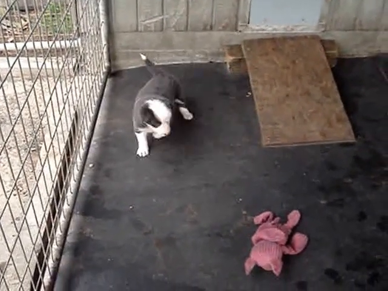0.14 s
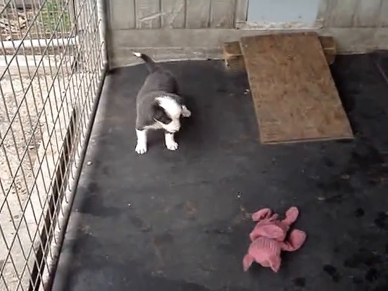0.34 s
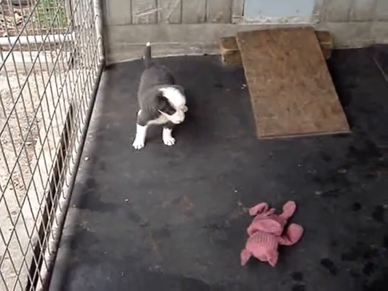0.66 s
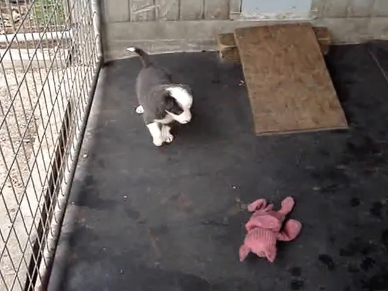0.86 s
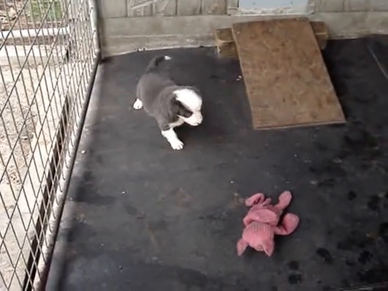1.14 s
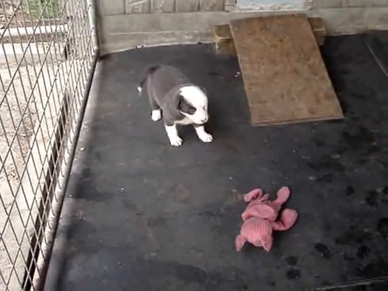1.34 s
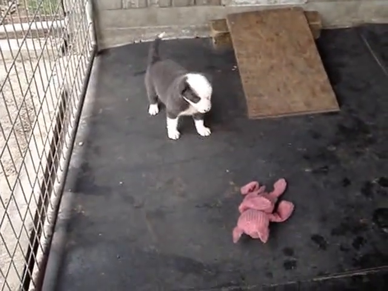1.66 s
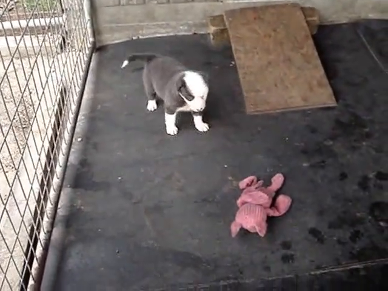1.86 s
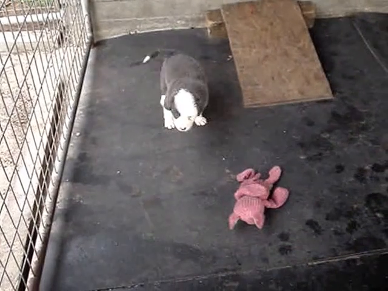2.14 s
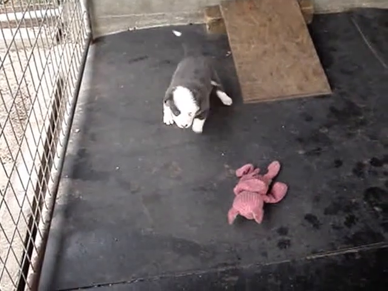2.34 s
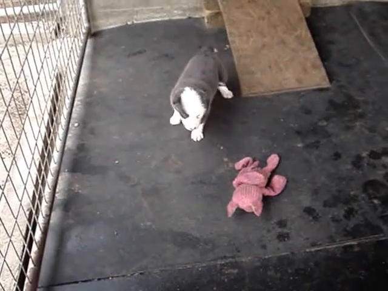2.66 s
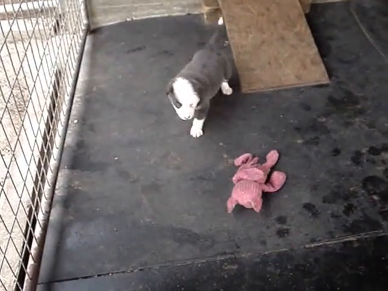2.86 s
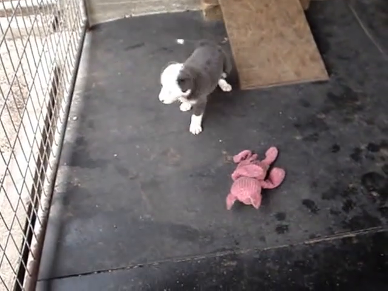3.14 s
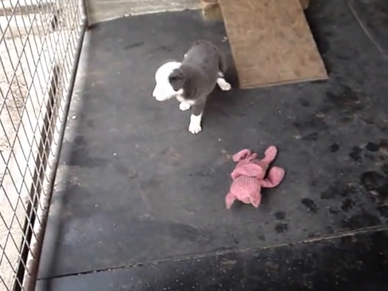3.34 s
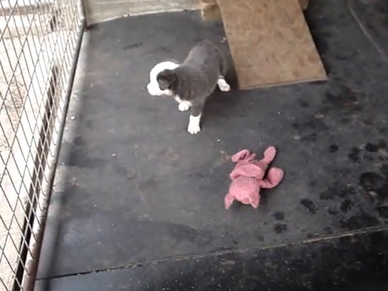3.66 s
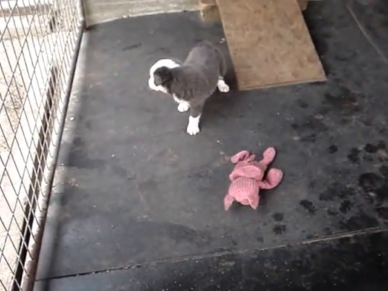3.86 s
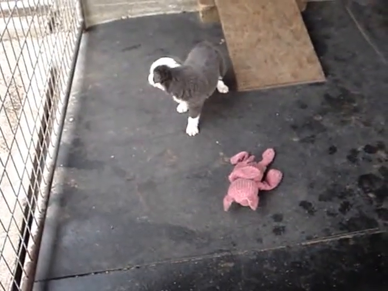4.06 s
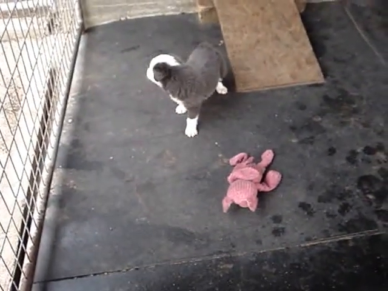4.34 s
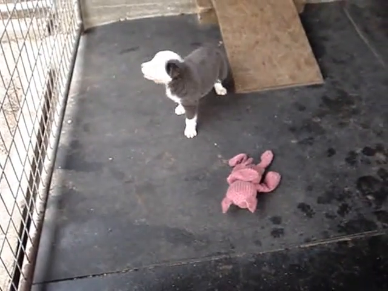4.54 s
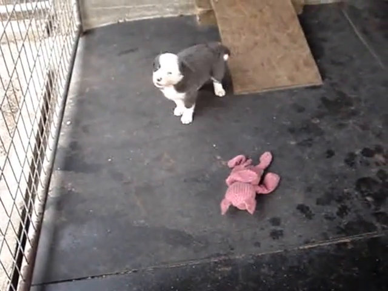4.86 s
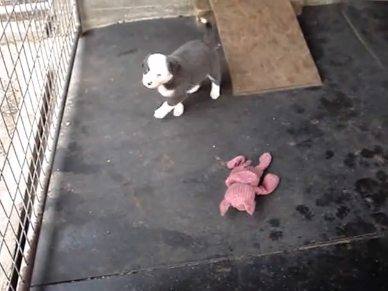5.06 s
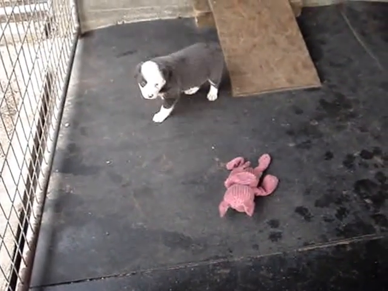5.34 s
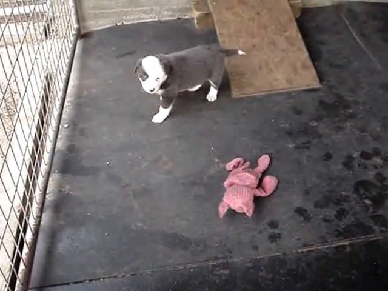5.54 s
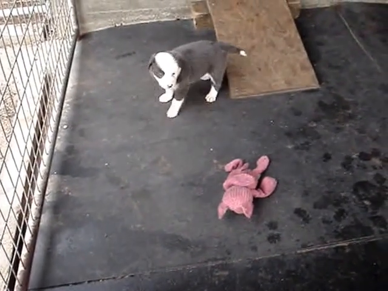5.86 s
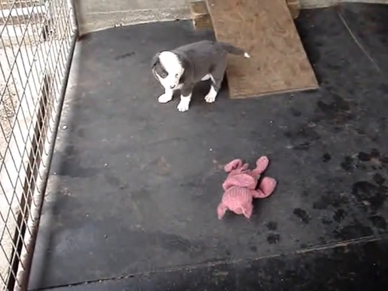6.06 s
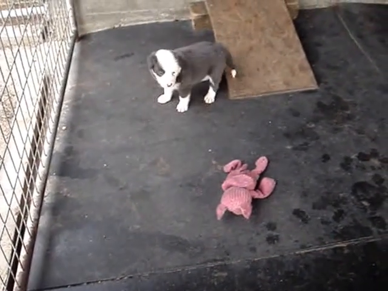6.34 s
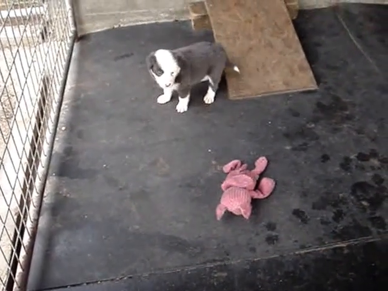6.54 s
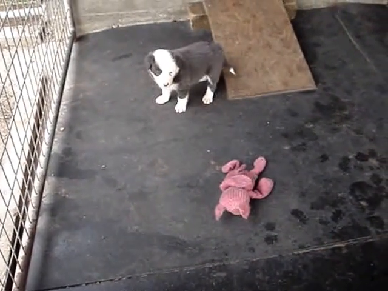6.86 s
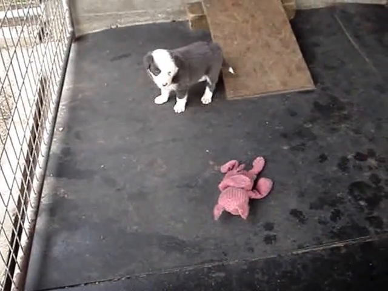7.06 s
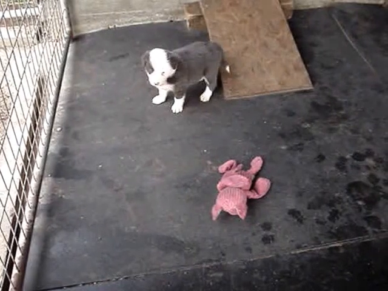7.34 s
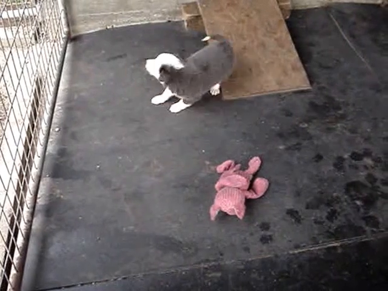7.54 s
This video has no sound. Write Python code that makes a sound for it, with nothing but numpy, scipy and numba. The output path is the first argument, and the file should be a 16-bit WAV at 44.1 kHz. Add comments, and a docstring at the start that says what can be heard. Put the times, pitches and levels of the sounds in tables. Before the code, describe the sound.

A young puppy gives four short hoarse barks at intervals, with soft huffs and grumbles between, over faint fan hum in a small kennel.

```python
"""A faint fan hum, airy hiss and a thin squeak are heard first; then a puppy huffs, grumbles and barks hoarsely
four times, and faint birds chirp. Filtered noise and wavering tones form the background.
Uneven vocal pulses and breath excite the resonances of throat and moving jaw; noise makes huffs and clicks.
Near echoes and a short reverberant tail give the small kennel, and the barks overload the microphone."""
import sys
import numpy as np
from scipy import signal
from scipy.fft import rfft, irfft
from scipy.io import wavfile
from scipy.ndimage import uniform_filter1d, map_coordinates
from numba import njit

SR = 44100
rng = np.random.default_rng(int(sys.argv[2]) if len(sys.argv) > 2 else 0)


def generate_wav(sig):
    """Save sig (samples, or channels by samples) to the path in sys.argv[1] as 16-bit PCM at SR."""
    pcm = np.round(np.clip(np.atleast_2d(sig).T, -1, 1) * 32767).astype(np.int16)
    wavfile.write(sys.argv[1], SR, pcm)


N = 339570
T = np.arange(N) / SR

# spectrum of the fan's broadband hum: frequency_hz, relative_level_db
HUM_SPECTRUM = [(25, -31), (75, -17), (120, -12.5), (160, -9.5), (250, -6.5), (330, -8.5), (450, -13),
                (600, -8), (900, -14)]
# tones in the fan hum: frequency_hz, amplitude_db (against the broadband hum)
HUM_TONES = [(150, -12.5), (198, -8), (298, -3.5)]
# spectrum of the airy hiss: frequency_hz, relative_level_db
HISS_SPECTRUM = [(240, -15), (400, -5), (496, -4), (1100, 2), (1270, -2.5), (1500, -2), (1650, -3),
                 (2240, -3), (4060, -11), (6770, -16), (10000, -24), (13000, -106), (22000, -120)]
# spells of squeaking: start_s, length_s, mean_level_db
SQUEAK_SPELLS = [(0.185, 1.34, -58.5), (3.165, 1.8, -58.5), (6.441, 2.1, -58.5)]
# bird chirps outside: start_s, peak_level_db, centre_pitch_hz
BIRD_CHIRPS = [(2.91, -55, 6600), (4.6, -50, 6430), (6.629, -51, 6600)]
# clicks of lips and claws: start_s, onset_level_db
MOUTH_AND_CLAW_CLICKS = [(1.235, -31), (2.163, -33), (2.596, -52), (2.898, -43.5), (5.291, -35)]
# soft huffs: start_s, level_db, mouth_resonance_hz, decay_s
BREATH_HUFFS = [(1.051, -37, 760, 0.067), (1.544, -36, 1150, 0.062), (1.79, -37, 880, 0.051),
                (1.882, -41.5, 1150, 0.13), (2.655, -41, 890, 0.072), (3.011, -46, 1150, 0.16),
                (3.317, -41, 1150, 0.052), (3.541, -38.5, 736, 0.045), (3.709, -39.5, 1190, 0.091),
                (3.973, -41, 700, 0.087), (4.391, -40.5, 760, 0.11), (4.805, -35.5, 674, 0.045),
                (5.23, -39, 866, 0.097), (6.186, -45, 1230, 0.11), (6.769, -39.5, 1140, 0.041),
                (6.882, -40.5, 1180, 0.062), (7.232, -42, 720, 0.061), (7.332, -39.5, 1240, 0.064)]
# spectrum of the huffing breath: frequency_hz, relative_level_db
HUFF_SPECTRUM = [(400, -24), (560, -2.5), (1200, -7), (1700, -8), (2600, -17), (6000, -31.5)]
# low grumbles: peak_s, peak_level_db, swell_db_per_s, upper_edge_hz
LOW_GRUMBLES = [(5.03, -30, 80, 9000), (5.68, -41, 42, 500)]
# vocal tract response in a grumble: frequency_hz, relative_level_db
GRUMBLE_SPECTRUM = [(110, -24), (170, 3.5), (300, 4.5), (400, -10), (520, 0), (1100, -2), (1500, 4),
                    (1850, -2), (2200, -11.5), (3000, -15), (3500, -12), (3900, -20), (8000, -27.5)]
# barks: burst_s, attack_s, length_s, level_db, sag_db, start_pitch_hz, middle_pitch_hz, end_pitch_hz,
# upper_throat_db, initial_roughness (0-1), hum_dip_db (before the hum's recovery is applied)
BARK_EVENTS = [ (1.283, .015, .12, -7, 8.5, 443, 356, 395, -.5, 0.6, 4.5),
               (2.176, .007, 0.098, -10, 8, 469.9, 350, 338, -1, 0.57, 23),
               (5.692, 0.01094, .093, -11, 7, 376.7, 350, 272, 3.5, 0.85, 19),
               (7.523, .021, 0.11, -10.5, 3, 379.3, 404, 410, -3.5, 0.59, 16)]
# throat response above the jaw resonance, one row a bark, each a list of: frequency_hz, relative_level_db
BARK_THROATS = [
    [(1550, -21), (1900, 0), (2300, 2), (2600, 3.5), (3300, 5), (3800, 1), (4300, -5.5), (5400, -9.5),
     (6300, -8), (7200, -18), (8000, -30.5)],
    [(1550, -18), (1850, 0), (2200, 2), (2500, -5.5), (3150, 2), (3600, -5.5), (4200, -10.5), (5900, -12),
     (6800, -23.5), (7600, -35.5)],
    [(1600, -8), (1850, -4), (2450, 0), (2780, -10), (3150, 1.5), (3450, -7), (3700, -24), (4300, -26.5),
     (4850, -19), (5300, -26), (5800, -12.5), (6400, -20), (7500, -40)],
    [(1650, -21), (2000, 0), (2600, 2.5), (3300, 2), (3900, -2.5), (4500, -4), (5100, -11), (5900, -7.5),
     (6500, -16.5), (7300, -30)],
]
# first echoes from floor, wall and door: delay_s, gain
FIRST_ECHOES = [(.0021, 0.098), (.0063, 0.38), (0.0116, .22)]
# kennel reverberation: frequency_hz, t60_s
REVERBERATION = [(200, 0.44), (1100, 0.39), (2500, 0.37), (6000, 0.29)]

# the fan hum sinks at each bark and creeps back
HUM_DB, HUM_SINK_S, HUM_RECOVER_S = -49.5, .11, 0.84
HISS_DB, BUZZ_DB = -50.5, -64.5
# each squeaking spell starts sharp and settles
SQUEAK_HZ, SQUEAK_SHARP_HZ, SQUEAK_SETTLE_S = 2590, 129, .35
SQUEAK_TURN_S, SQUEAK_FADE_SHARE = .198, 0.33
# each grumble swells to its peak and stops
GRUMBLE_SWELL_S, GRUMBLE_RELEASE_S, GRUMBLE_RELEASE_DB_PER_S = .21, 0.016, 650
# every bark: a lead-in swells to the burst, the level sags, the voice cuts off
LEAD_S, LEAD_DB, LEAD_DB_PER_S = .04, -23.5, 680
RELEASE_S, RELEASE_DB_PER_S = .07, 750
# from burst to end the voice clears (share of its roughness) and dulls
CLEARING, DULLING_DB = 0.385, 4
# pitch and treble climb with effort on the way in; the jaw stays tuned near the third harmonic
PITCH_OCTAVES_PER_DB, TREBLE_DB_PER_DB, JAW_PER_PITCH = 0.45, 0.67, 2.98
TOP_HZ = 10000


def undb(db):
    """Amplitude gain is ten to the power of decibels over twenty."""
    return 10 ** (np.asarray(db) / 20)


def unit(x):
    """Normalisation: scale to an rms of 1."""
    return x / np.sqrt(np.mean(x ** 2) + 1e-18)


def steady(x, size=900):
    """Level control: hold the short-term rms near 1."""
    return x / np.sqrt(np.abs(uniform_filter1d(x * x, size)) + 1e-12)


def walk(rate, count):
    """Random modulation: join `rate` random values a second smoothly, with an rms of 1."""
    knots = np.arange(count) * rate / SR
    values = rng.standard_normal(int(knots[-1]) + 3)
    return unit(map_coordinates(values, [knots], order=3, mode="nearest"))


def tone(hz):
    """Phase is the running integral of frequency; its sine is a tone of moving pitch."""
    return np.sin(2 * np.pi * np.cumsum(hz) / SR)


def colour(x, points):
    """Spectral shaping: follow a (Hz, dB) curve that falls away beyond its ends, at an rms of 1."""
    hz, db = np.transpose(points)
    f = np.maximum(np.fft.rfftfreq(len(x), 1 / SR), 1)
    skirts = np.minimum(f / hz[0], 1) ** 2 * np.minimum(hz[-1] / f, 1) ** 2
    gain = undb(np.interp(np.log(f), np.log(hz), db))
    return unit(irfft(rfft(x) * skirts * gain, len(x)))


def band(x, hz, kind, order):
    """Butterworth filtering: a maximally flat low-pass or high-pass."""
    return signal.sosfilt(signal.butter(order, hz, kind, fs=SR, output="sos"), x)


@njit
def svf(x, hz, width):
    """State-variable resonance: two coupled integrators form a band-pass with a moving centre."""
    y, band_state, low_state = np.empty(len(x)), 0., 0.
    for i in range(len(x)):
        g, k = np.tan(np.pi * hz[i] / SR), width / hz[i]
        v = (band_state + g * (x[i] - low_state)) / (1 + g * (g + k))
        band_state = 2 * v - band_state
        low_state += 2 * g * v
        y[i] = k * v
    return y


def resonance(x, hz, width):
    """Cascaded resonance: applying the band-pass twice steepens its sides."""
    hz = np.full(len(x), 1.) * hz
    return svf(svf(x, hz, float(width)), hz, float(width))


def add(out, start, x):
    """Superposition: mix x into out at a time in seconds."""
    i = max(int(start * SR), 0)
    out[i:i + len(x)] += x[:len(out) - i]


def hum_level():
    """Level modulation: the hum, in dB, dips quickly at each bark and recovers exponentially."""
    db = np.full(N, 1.) * HUM_DB
    for burst, *_, dip_db in BARK_EVENTS:
        since = np.maximum(T - burst, 0)
        db = db - dip_db * np.minimum(since / HUM_SINK_S, 1) * np.exp(-since / HUM_RECOVER_S)
    return db


def fan_hum(hum_db):
    """Broadband and tonal noise: shaped random sound joined by wavering tones."""
    hum = colour(rng.standard_normal(N), HUM_SPECTRUM)
    for hz, db in HUM_TONES:
        hum = hum + undb(db + walk(6, N)) * tone(hz * (1 + 0.0132 * walk(30, N)))
    return hum * undb(hum_db)


def air_hiss(hum_db):
    """Shaped noise: an airy hiss wavers and faintly follows the level of the hum."""
    swell_db = hum_db - hum_db.mean()
    level_db = HISS_DB + 0.14 * swell_db + 1.1 * walk(15, N)
    return colour(rng.standard_normal(N), HISS_SPECTRUM) * undb(level_db)


def mains_buzz():
    """Amplitude modulation: resonant noise is pulsed at the 60 Hz mains rate."""
    pulses = np.exp(-(T * 60 % 1) * 6)
    return unit(pulses * resonance(rng.standard_normal(N), 5400, 3400)) * undb(BUZZ_DB)


def background():
    """Superposition of the fan's hum, the airy hiss and a faint mains buzz."""
    hum_db = hum_level()
    return fan_hum(hum_db) + air_hiss(hum_db) + mains_buzz()


def squeak():
    """Joint modulation: a thin, far tone swells five times a second and dips in pitch as it does."""
    out = np.zeros(N)
    for start, length, db in SQUEAK_SPELLS:
        t = np.arange(0, length, 1 / SR)
        turn = np.cos(2 * np.pi * t / SQUEAK_TURN_S + .4 * walk(2, len(t)))
        settling_hz = SQUEAK_HZ + SQUEAK_SHARP_HZ * np.exp(-t / SQUEAK_SETTLE_S)
        hz = settling_hz - 25 * turn + 35 * walk(150, len(t))
        swell_db = 5 * turn + 2 * walk(25, len(t))
        fade = signal.windows.tukey(len(t), SQUEAK_FADE_SHARE)
        add(out, start, tone(hz) * undb(db + swell_db) * fade)
    return out


def birds():
    """Frequency modulation: thin chirps rise and waver in pitch."""
    out, t = np.zeros(N), np.arange(SR // 14) / SR
    for start, db, hz in BIRD_CHIRPS:
        pitch = hz * (1 + 0.78 * (t - t.mean()) + 0.039 * walk(447, len(t)))
        add(out, start, undb(db) * np.hanning(len(t)) * tone(pitch))
    return out


def click():
    """Damped impact: a burst of shaped noise decays exponentially within milliseconds."""
    t = np.arange(SR // 20) / SR
    noise = colour(rng.standard_normal(len(t)), [(150, -3), (2000, 1), (8000, -15.0)])
    return np.exp(-t / 0.0059) * noise


def huff(mouth_hz, decay):
    """Turbulent flow: a puff of air excites the muzzle, with a sudden start."""
    t = np.arange(SR // 2) / SR
    air = rng.standard_normal(len(t))
    mouth = unit(resonance(air, mouth_hz, 330))
    breath = steady(colour(air, HUFF_SPECTRUM) + undb(-3.5) * mouth)
    attack = 1 - np.exp(-t / .004)
    return breath * attack * np.exp(-(t / decay) ** 2)


def folds(hz, rough, jitter, shimmer_db, breath):
    """Vocal-fold vibration: uneven pulses, alternately strong and weak, each with a puff of air.

    Jitter, shimmer and breath are given for full roughness; the phase is returned too."""
    n = len(hz)
    phase = 2 * np.pi * np.cumsum(hz * (1 + jitter * rough ** 1.5 * walk(450, n))) / SR
    harmonics = sum(np.cos(k * phase) for k in range(1, int(8000 / hz.mean())))
    # half the pitch sets strong and weak pulses alternating
    pulses = unit(harmonics) * (1 + rough * np.cos(phase / 2))
    air = unit(rng.standard_normal(n) * (2 + np.cos(phase)))
    air_share = np.clip(breath * rough, 0, 1)
    source = np.sqrt(1 - air_share) * pulses + np.sqrt(air_share) * air
    return source * undb(shimmer_db * rough * walk(224.9, n)), phase


def grumble(peak_db, swell_db_per_s, edge_hz):
    """Irregular phonation: slow, ragged pulses of unsteady pitch in a nearly closed mouth."""
    t = np.arange(-GRUMBLE_SWELL_S, GRUMBLE_RELEASE_S, 1 / SR)
    db = peak_db + np.minimum(swell_db_per_s * t, -GRUMBLE_RELEASE_DB_PER_S * t)
    hz = 172 * (1 + .07 * walk(40, len(t)))
    source, _ = folds(hz, .93, jitter=.12, shimmer_db=2, breath=.95)
    muffled = band(colour(source, GRUMBLE_SPECTRUM), edge_hz, "low", order=1)
    return steady(muffled) * undb(db) * signal.windows.tukey(len(t), .05)


def gesture(attack, length, peak_db, sag_db, pitches, upper_db, rough):
    """Vocal effort: level, pitch, jaw resonance, upper throat level and roughness move together."""
    t = np.arange(-LEAD_S, length + RELEASE_S, 1 / SR)
    progress = np.clip(t / length, 0, 1)
    attack_db = (LEAD_DB - peak_db) * np.clip(1 - t / attack, 0, 1)
    effort_db = attack_db + LEAD_DB_PER_S * np.minimum(t, 0)
    release_db = RELEASE_DB_PER_S * np.maximum(t - length, 0)
    db = peak_db + effort_db - sag_db * progress - release_db
    aim_hz = np.interp(progress, [0, .5, 1], pitches)
    hz = aim_hz * 2 ** (PITCH_OCTAVES_PER_DB * effort_db)
    treble_db = upper_db + TREBLE_DB_PER_DB * effort_db - DULLING_DB * progress
    roughness = np.clip(rough * (1 - CLEARING * progress), 0, 1)
    return db, hz, JAW_PER_PITCH * aim_hz, treble_db, roughness


def bark(db, hz, jaw_hz, upper_db, rough, throat):
    """Source and filter: a hoarse voice rings jaw and throat; its third harmonic on the jaw gives the yap."""
    source, phase = folds(hz, rough, jitter=.09, shimmer_db=3.5, breath=.8)
    # the bark starts as a hum through closed lips; the yap takes over once they burst open
    closed = 1 / (1 + undb(2 * (np.maximum.accumulate(db) + 29)))
    hum = steady(np.sin(phase) + 2.8 * steady(resonance(source, 330, 270)))
    yap = undb(11.5) * (1 - closed) * (1 - rough) * np.sin(3 * phase)
    jaw = steady(yap + steady(resonance(source, jaw_hz, 374)))
    # the small open mouth radiates little bass
    jaw = band(jaw, 783, "high", order=4)
    # the treble opens as the bark is pushed
    upper = colour(source, throat)
    dull = band(upper, 1400, "low", order=1)
    effort = undb((db - db.max()) / 2)
    upper = steady(dull + effort * (upper - dull))
    voice = steady(jaw + undb(upper_db) * upper)
    return (voice + undb(-3) * closed * hum) * undb(db) * signal.windows.tukey(len(db), .06)


def puppy():
    """Superposition of the puppy's clicks, huffs, grumbles and barks."""
    out = np.zeros(N)
    for start, db in MOUTH_AND_CLAW_CLICKS:
        add(out, start, undb(db) * click())
    for start, db, mouth_hz, decay in BREATH_HUFFS:
        add(out, start, undb(db) * huff(mouth_hz, decay))
    for peak, db, swell_db_per_s, edge_hz in LOW_GRUMBLES:
        add(out, peak - GRUMBLE_SWELL_S, grumble(db, swell_db_per_s, edge_hz))
    for event, throat in zip(BARK_EVENTS, BARK_THROATS):
        burst, attack, length, db, sag_db, *pitches, upper_db, rough, _ = event
        motion = gesture(attack, length, db, sag_db, pitches, upper_db, rough)
        add(out, burst - LEAD_S, bark(*motion, throat))
    return out


def kennel(x):
    """Room response: direct sound, three near echoes and a diffuse tail that dies sooner in the treble."""
    t = np.arange(SR * 3 // 4) / SR
    hz, t60 = np.transpose(REVERBERATION)
    f = np.fft.rfftfreq(len(t), 1 / SR)
    noise = rfft(rng.standard_normal(len(t)))
    tail = np.zeros(len(t))
    # overlapping bands of noise, each falling 60 dB in its own time
    for weights, decay in zip(np.eye(len(hz)), t60):
        tail += irfft(noise * np.interp(f, hz, weights), len(t)) * undb(-60 * t / decay)
    tail *= 1 - np.exp(-t / 0.0023)
    response = undb(-9) * tail / np.linalg.norm(tail)
    response[0] += .85
    for delay, gain in FIRST_ECHOES:
        response[int(delay * SR)] += gain
    return signal.fftconvolve(x, response)[:N]


def scene():
    """Superposition of the background, squeak, birds and the puppy in its kennel."""
    return (background() + squeak() + birds() + kennel(puppy()))[None]


def record(dry):
    """Nonlinear distortion: a fast limiter flattens the barks, the microphone overloads, the top is cut."""
    power = np.abs(uniform_filter1d(dry ** 2, size=220))
    held = dry / (1 + (power / undb(-4) ** 2) ** 2) ** (1 / 4)
    # one side gives way sooner; smoothing the excess leaves the treble of the rasp dull
    ceiling = np.where(held > 0, .47, .75)
    excess = held - held / (1 + (held / ceiling) ** 6) ** (1 / 6)
    clipped = held - uniform_filter1d(uniform_filter1d(excess, size=3), size=3)
    # the lopsided overload adds a low thud to each bark
    thud = undb(-23.0) * band(held ** 2, 35, "low", order=1)
    out = band(clipped - thud, 15, "high", order=1)
    return signal.sosfilt(signal.ellip(8, .2, 70, TOP_HZ, fs=SR, output="sos"), out)


dry = scene()
out = record(dry)
generate_wav(out)
```